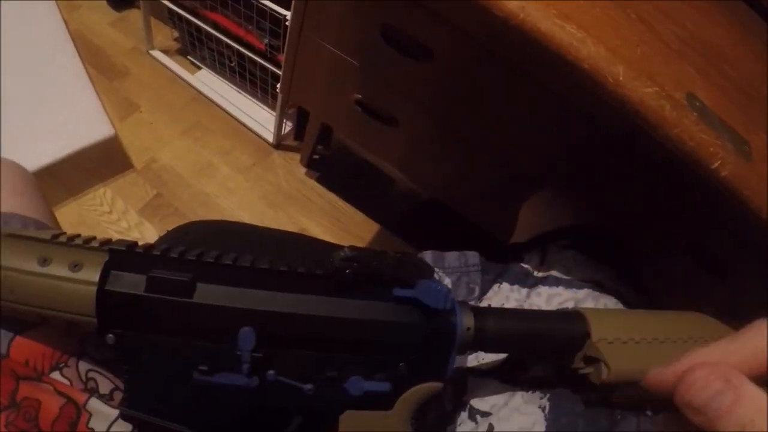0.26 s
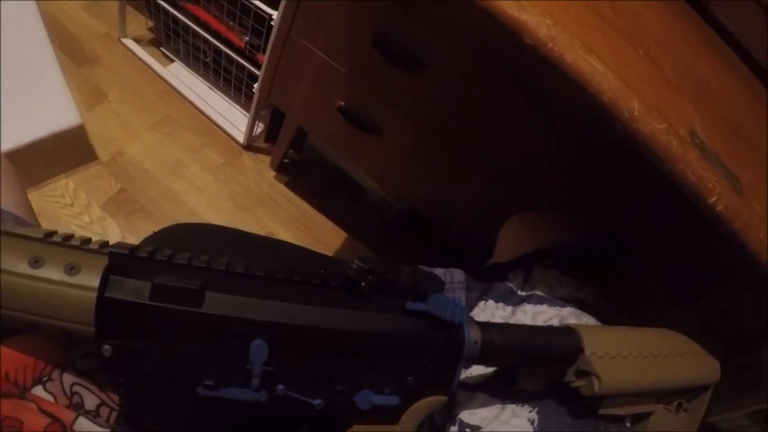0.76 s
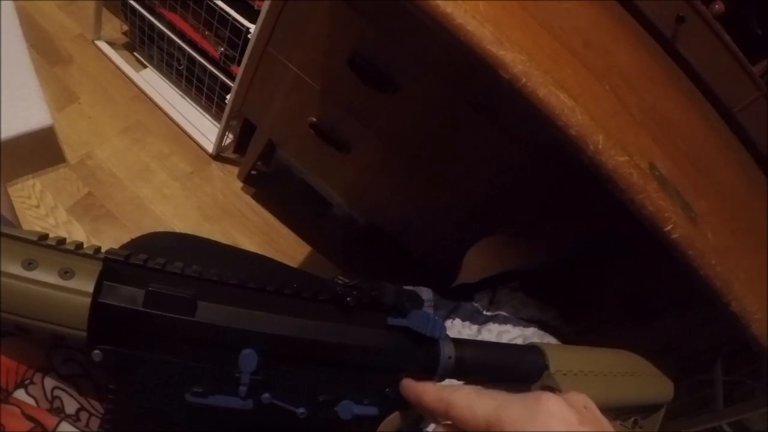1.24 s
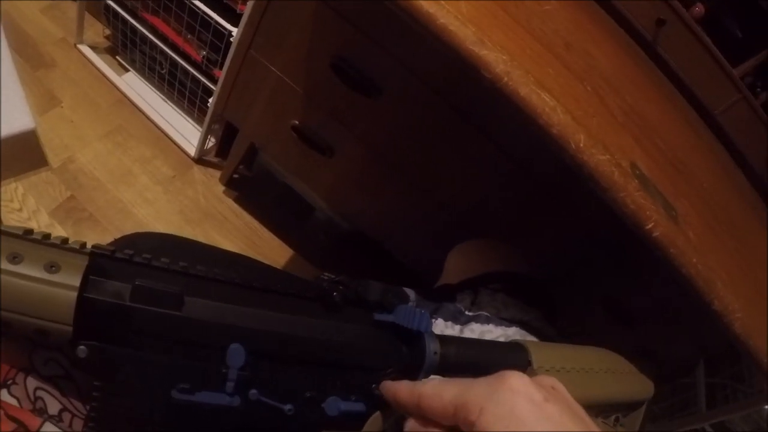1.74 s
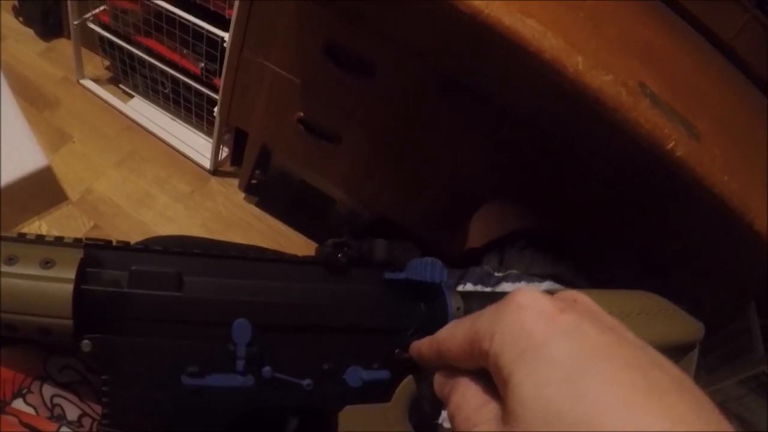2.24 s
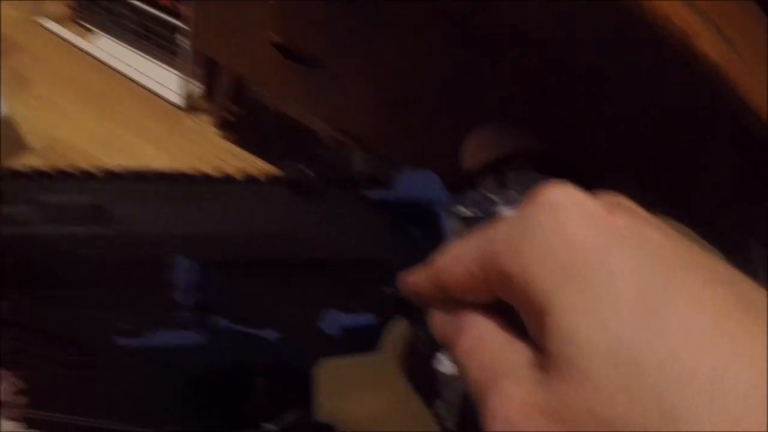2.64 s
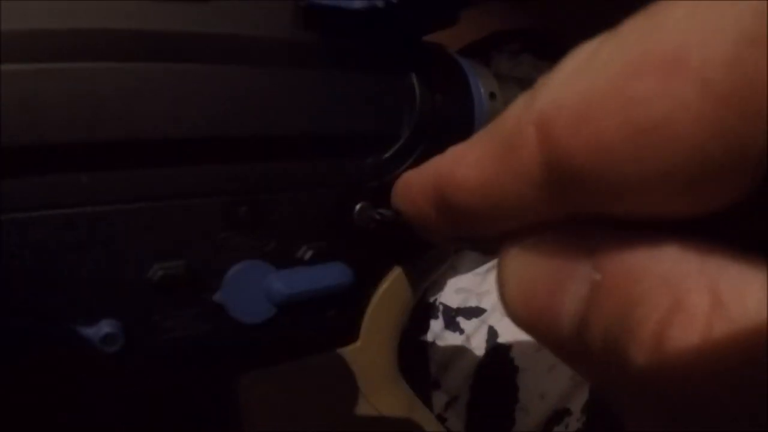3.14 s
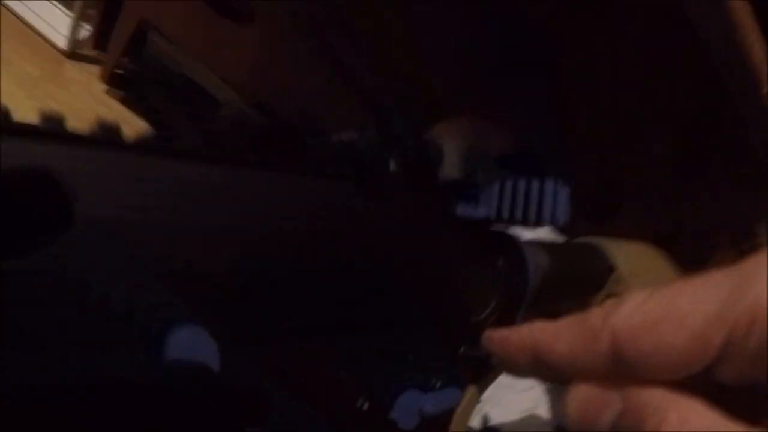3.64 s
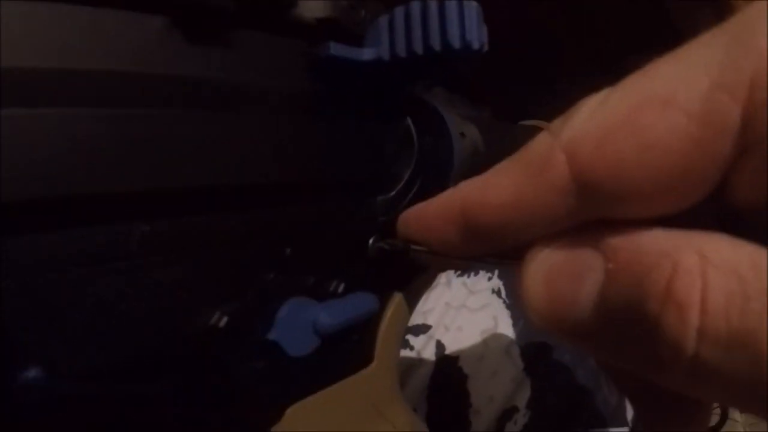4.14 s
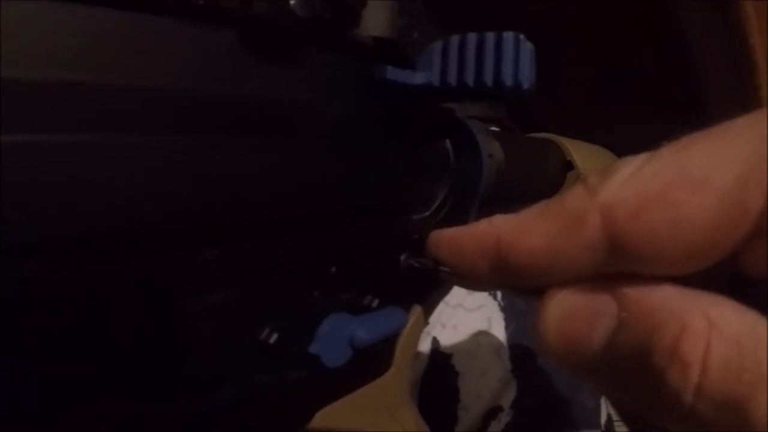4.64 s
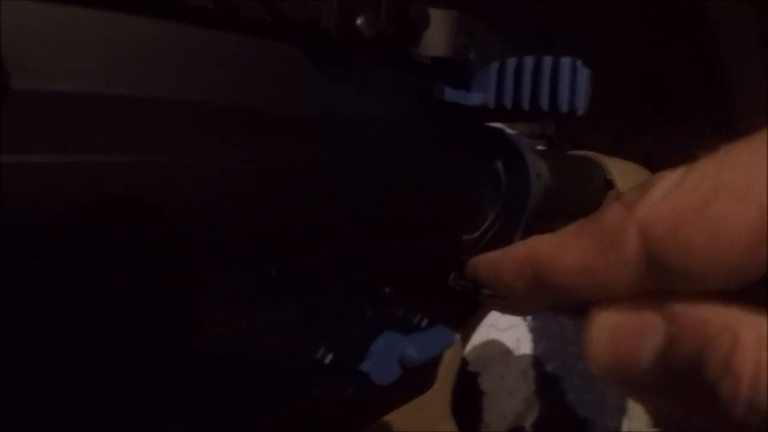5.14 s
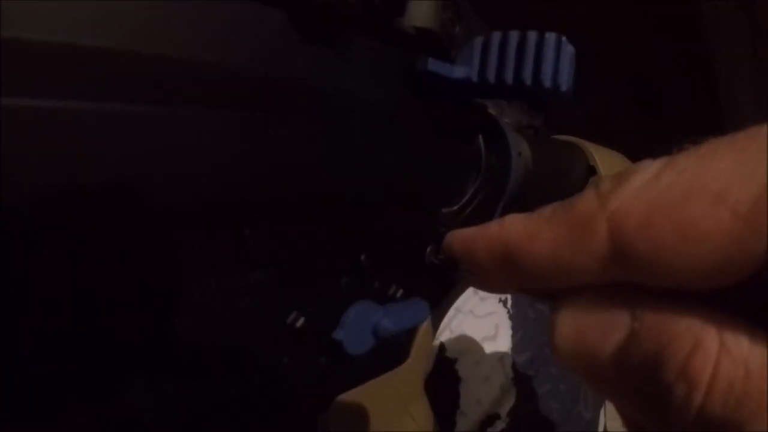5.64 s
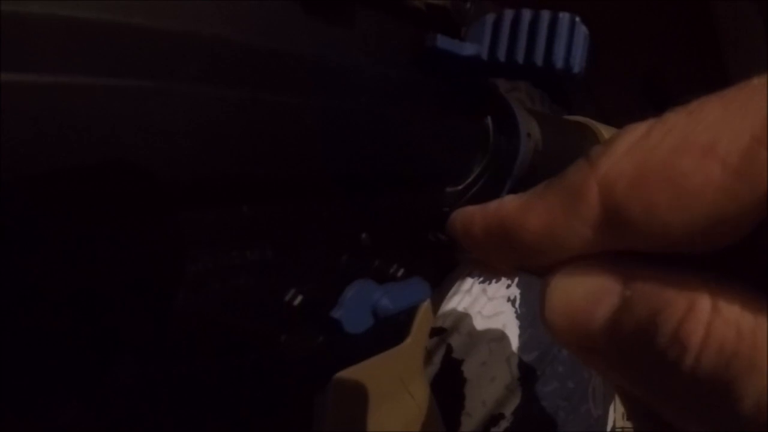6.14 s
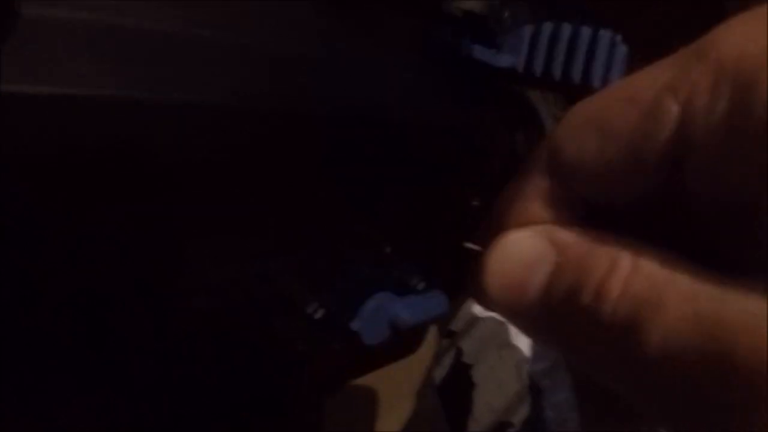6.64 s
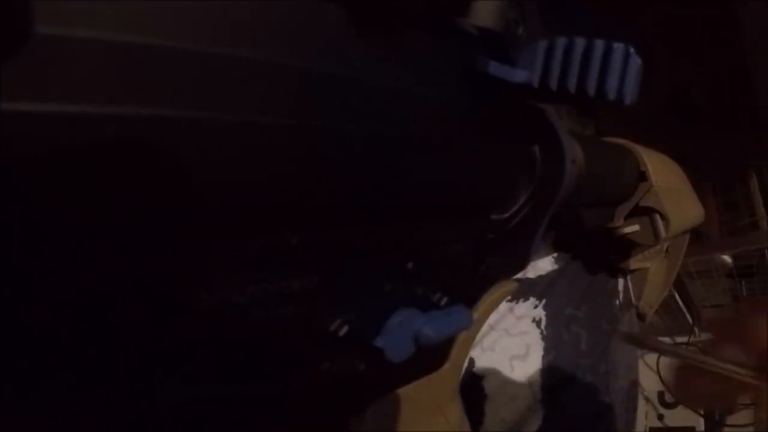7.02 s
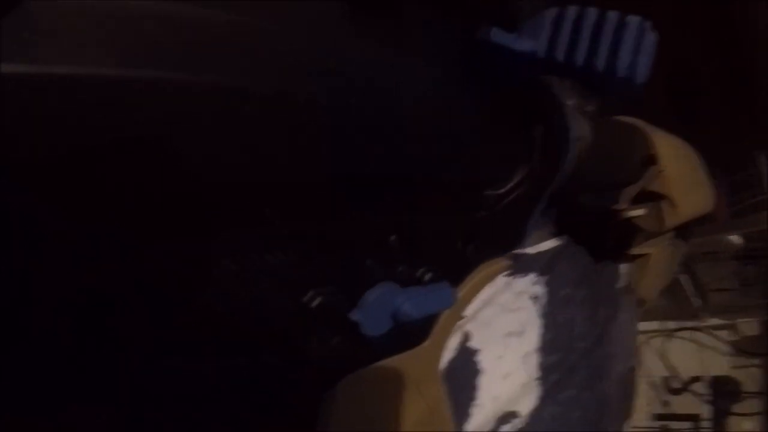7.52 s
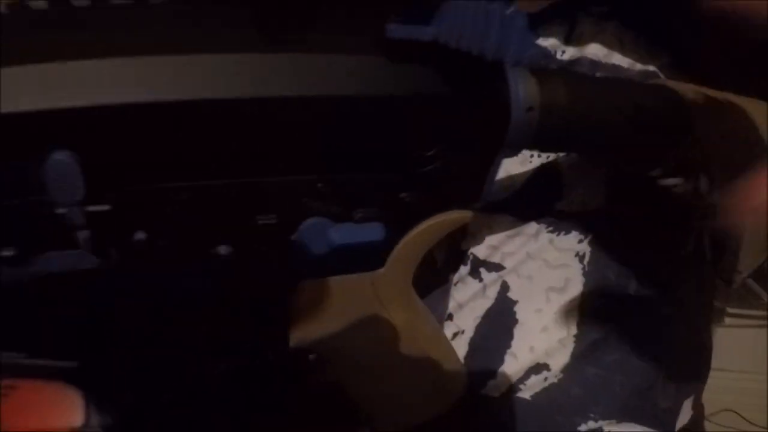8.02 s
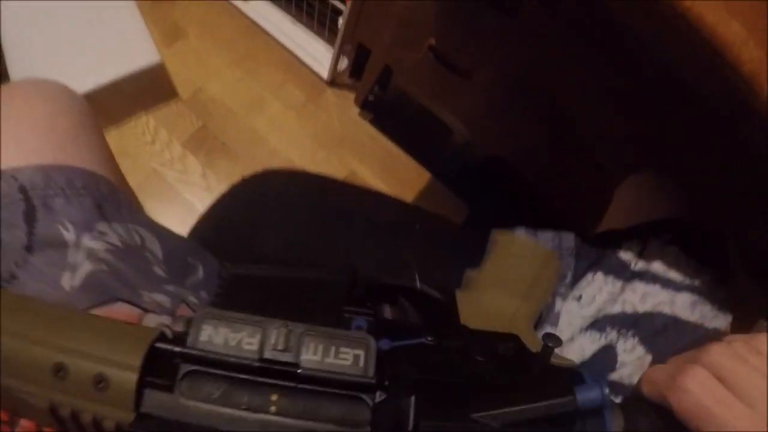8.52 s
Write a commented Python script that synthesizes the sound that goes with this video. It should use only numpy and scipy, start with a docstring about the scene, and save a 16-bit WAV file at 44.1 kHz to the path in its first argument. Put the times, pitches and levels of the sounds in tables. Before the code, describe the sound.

Faint ticks, then camera bumps and hard metallic clicks as a tool drives a pin through an airsoft rifle, ending in a ringing, rattling clatter.

```python
"""An airsoft rifle is handled on a lap in a small room: a tool clicks against a body pin and slides it
through, then the receiver swings open with a clatter. Contacts and slips drive damped resonances; a few
blows leave dying partials. A body-worn camera right above bumps the receiver, and decaying low sines
rock it on its mount. Coloured noises make the mount rumble, the clothes, a fingertip and the room's hush."""
import sys
import numpy as np
from scipy import signal
from scipy.fft import rfft, irfft, next_fast_len
from scipy.io import wavfile
from scipy.ndimage import map_coordinates

SR = 44100
rng = np.random.default_rng(int(sys.argv[2]) if len(sys.argv) > 2 else 0)


def to_wav(sig):
    """Store sig (one row per channel, or 1-D mono) as 16-bit WAV at the path in sys.argv[1].

    Samples outside -1..1 are clipped; the rate is SR.
    """
    pcm = np.clip(np.atleast_2d(sig), -1, 1) * 32767
    pcm = np.round(pcm).astype(np.int16)
    wavfile.write(sys.argv[1], SR, pcm.T)  # frames by channels


N = 386983

# resonances of the rifle: centre_hz, width_hz, level_db
RIFLE_MODES = [(197, 157, 2), (400, 240, -15), (695, 230, -9), (1238, 181, 5.5), (1590, 180, -0.5),
               (1970, 450, -3.5), (2760, 390, -4), (3770, 860, -4.5), (4700, 630, 2.5), (5900, 860, 1.5),
               (7120, 1450, -3.5), (8340, 1720, -13.5)]
# bands of knock, hollow, clack and tick: low_hz, high_hz
REGISTER_BANDS = [(150, 700), (800, 1700), (1700, 4500), (4500, 11500)]
IS_HOLLOW = np.arange(len(REGISTER_BANDS)) == 1


def amp(db):
    """Decibels to gain."""
    return 10 ** (np.asarray(db) / 20)


def unit(x):
    """Scale to rms 1."""
    return x / np.sqrt(np.mean(x ** 2) + 1e-20)


def along(points, hz):
    """Interpolate (Hz, value) points on a log frequency axis."""
    f, v = np.transpose(points)
    return np.interp(np.log(hz + 1), np.log(f + 1), v)


def wobble(knots_per_s):
    """A smooth random curve over the whole scene."""
    knots = rng.standard_normal(int(N * knots_per_s / SR) + 4)
    return map_coordinates(knots, [np.arange(N) * knots_per_s / SR])


def filtered(x, response):
    """Multiply the spectrum of x by a complex response of frequency."""
    n = x.shape[-1]
    m = next_fast_len(n + 8192)
    return irfft(rfft(x, m) * response(np.fft.rfftfreq(m, 1 / SR)), m)[..., :n]


def pan(left_right_db):
    """Left and right gains of constant power; positive leans left."""
    return unit(amp([[left_right_db / 2], [-left_right_db / 2]]))


def pair(n, alike):
    """Two white noises with the correlation alike."""
    a, b = rng.standard_normal((2, n))
    u = np.arccos(np.clip(alike, -1, 1)) / 2
    return np.array([np.cos(u) * a + np.sin(u) * b, np.cos(u) * a - np.sin(u) * b])


def rush(spectrum, alike):
    """Coloured stereo noise of rms 1, with a left-right correlation for each frequency."""
    def split(hz):
        u = np.arccos(np.clip(along(alike, hz), -1, 1)) / 2
        return amp(along(spectrum, hz)) * [np.cos(u), np.sin(u)]

    mid, side = filtered(rng.standard_normal((2, N)), split)
    return unit(np.array([mid + side, mid - side]))


def add(out, start_s, x):
    """Mix x into out from start_s."""
    i = max(round(start_s * SR), 0)
    out[:, i:i + x.shape[-1]] += x[..., :max(N - i, 0)]


def stroke(start_s, end_s, taper):
    """A gain that rises and falls between two times; taper is the share spent rising and falling."""
    u = np.clip((np.arange(N) / SR - start_s) / (end_s - start_s), 0, 1)
    edge = np.minimum(2 * np.minimum(u, 1 - u) / taper, 1)
    return np.sin(np.pi / 2 * edge) ** 2


def resonate(force, modes):
    """Pass a force through parallel damped resonances of alternating sign."""
    def response(f):
        total = 0
        for k, (centre, width, db) in enumerate(sorted(modes)):
            damping = 1j * f * width
            total = total + (-1) ** k * amp(db) * damping / (centre * centre - f * f + damping)
        return total

    return filtered(force, response)


def registers(force, modes):
    """A body's answer to a force, split into knock, hollow, clack and tick."""
    y = resonate(force, modes)
    filters = [signal.butter(2, band, 'band', fs=SR, output='sos') for band in REGISTER_BANDS]
    return [signal.sosfilt(sos, y) for sos in filters]


def tone(rule, strength_db, hardness_db):
    """Register levels of a contact: a harder one shifts its energy upward."""
    return np.array([strength_db + db + share * hardness_db for db, share in rule])


def strike(modes, levels_db, chatter_db, t60_s, alike):
    """A sharp push and a decaying noise chatter drive the modes; each register has its own level."""
    t = np.arange(SR // 12) / SR
    force = pair(len(t), alike) * amp(chatter_db - 60 * t / t60_s)
    force[:, 0] += 1
    # levels are rms with the energy referred to 5 ms
    scale = np.sqrt(.005 / t[-1])
    return [amp(db) * unit(y) * scale for db, y in zip(levels_db, registers(force, modes))]


def slipping(n, spread_db, alike):
    """A noise force of n samples in sub-millisecond slips; spread_db makes their strengths uneven."""
    slip_gains = amp(spread_db * rng.exponential(size=n // 32 + 1))
    return pair(n, alike) * np.repeat(slip_gains, 32)[:n]


def ring(partials):
    """Slowly dying partials, at slightly different strengths and phases for each microphone."""
    t = np.arange(SR * 3 // 4) / SR
    y = np.zeros((2, len(t)))
    for hz, db, t60_s in partials:
        level_db = db + rng.standard_normal((2, 1))
        phase = rng.uniform(0, 2 * np.pi) + .5 * rng.standard_normal((2, 1))
        y += amp(level_db - 60 * t / t60_s) * np.sin(2 * np.pi * hz * t + phase)
    return y * (1 - np.exp(-t / 0.00067))


def clicks():
    """Tool, pin and rifle parts knock the receiver; each spot wakes its resonances a little differently."""
    # contacts: start_s, strength_db, hardness_db, extra_hollow_db, left_right_db
    contacts = [(.369, -49.5, 1, -7, -11), (0.4218, -54, 3, 0, -17), (0.5163, -47.5, 0, -8, -27),
                (0.778, -54.5, -7, -4, -5), (1.167, -44, 2.5, -3, -6), (1.2614, -50.5, 7, -2, -11),
                (2.2779, -51, 3, -8, 1), (2.3237, -49.5, 9, 1, -7), (2.9785, -58, 4, -2, -5),
                (4.782, -33.5, -4.5, -6, -4), (4.8163, -25, -0.5, -0.5, -1.5), (5.0903, -45.5, 0, -3.5, 9),
                (5.366, -58, -1.5, 0, -4), (5.955, -22, -0.5, 6, 0), (5.966, -36.5, -5, -14, 16),
                (6.2023, -35, -4.5, -2.5, -1), (6.2084, -37.5, -1, 7.5, 6), (6.4959, -37, -4, -0.5, 3),
                (6.5449, -33.5, 10.5, -7, 5), (6.56, -25, 6, 5.5, 2), (6.561, -20, 2, -3, -1.5),
                (6.6561, -42, 0, -4.5, -1), (6.755, -60.5, -12, -2.5, -1), (6.828, -49.5, 3.5, 3, 2),
                (6.955, -51.5, 3.5, 1, -12), (7.1071, -50.5, 4.5, -6, -13), (7.742, -36, 0.5, 0, -4),
                (7.7633, -31, 0, 0, -7), (7.767, -27, -1, -9, -2), (7.7719, -28, -1, -4, -9),
                (7.864, -48, -5, 2.5, -8), (8.1647, -48.5, 6, -3, -16), (8.3032, -51.5, -1.5, 6.5, -10),
                (8.3444, -35.5, 0, 1, -1.5), (8.466, -47.5, 4, 4, -5), (8.6784, -34, 0.5, 0, -33)]
    # per register, low to high: offset_db, db_per_db_hardness
    tone_rule = [(-4, -1.36), (0.8, -0.99), (1.47, 0.12), (0.54, 1)]
    out = np.zeros((2, N))
    for start_s, strength_db, hardness_db, hollow_db, side_db in contacts:
        modes = [(hz, width, db + 2 * rng.standard_normal()) for hz, width, db in RIFLE_MODES]
        levels_db = tone(tone_rule, strength_db, hardness_db) + hollow_db * IS_HOLLOW
        knock, *bright = strike(modes, levels_db, chatter_db=-17.5, t60_s=0.024, alike=0.29)
        add(out, start_s, knock * pan(-1.5) + sum(bright) * pan(side_db))
    return out


def slides():
    """Sliding parts and fingers catch in many tiny slips; strokes swell into a stop or die away."""
    # slides and rattles: start_s, end_s, strength_db, hardness_db, swell_db
    slide_strokes = [(0.29, .316, -69, 10.5, 0), (0.506, 0.595, -63.5, -4, -8),
                     (1.16, 1.233, -55.5, 7, -18), (2.274, 2.303, -58.5, -0.5, -13),
                     (2.32, 2.389, -56, 6, -19), (2.749, 2.822, -57.5, -9.5, 27),
                     (2.86, 2.876, -55.5, -4, 4), (2.904, 2.922, -51, -2, -16),
                     (3.762, 3.835, -53, 1.5, -5), (4.769, 4.782, -58, 1, 5), (4.797, 4.822, -42, 0, 11),
                     (4.825, 4.86, -57, -2, -14), (5.09, 5.143, -57.5, 4, -10),
                     (5.936, 5.952, -52, -2.5, 13), (6.498, 6.521, -44, 3, 13), (6.517, 6.568, -36, 4, 3),
                     (6.926, 6.967, -62, 4, 12), (7.739, 7.765, -46.5, 1.5, -12),
                     (7.769, 7.866, -46, 0.5, -27), (8.161, 8.2, -58.5, 10.5, -8),
                     (8.209, 8.262, -56.5, -2.5, -3), (8.262, 8.288, -57, 5.5, 1),
                     (8.468, 8.497, -53, 6.5, -7), (8.659, 8.681, -53, -3, 4),
                     (8.679, 8.729, -51, -1.5, -17)]
    # per register, hollow to tick: offset_db, db_per_db_hardness
    tone_rule = [(-1.4, -1.02), (1.56, 0.072), (-1.2, 0.93)]
    # thin hiss of the rubbing surfaces: centre_hz, width_hz, level_db
    friction_modes = [(9140, 690, -10.5)]
    out = np.zeros((2, N))
    for start_s, end_s, strength_db, hardness_db, swell_db in slide_strokes:
        n = max(round((end_s - start_s) * SR), 64)
        pressure = signal.windows.tukey(n, .2) * amp(np.linspace(0, swell_db, n))
        force = slipping(n, spread_db=2.0, alike=0.13) * pressure
        force = np.pad(force, ((0, 0), (0, SR // 50)))  # room to ring out
        levels_db = tone(tone_rule, strength_db, hardness_db)
        parts = registers(force, RIFLE_MODES + friction_modes)[1:]
        y = sum(amp(db) * unit(part) for db, part in zip(levels_db, parts))
        add(out, start_s, y * np.sqrt(force.shape[1] / n))
    return out


def hinge():
    """The receiver drops against its stop and shudders on its hinge while its loose parts rattle out."""
    # shudder partials: pitch_hz, level_db, t60_s
    shudder = [(167.2, -36, 0.68), (193.5, -29, 0.53), (262, -39, 1), (457, -49, 0.44), (778, -45.5, 0.53),
               (1295, -34, 0.29), (1620, -36, 0.31), (1780, -26, 0.1), (2300, -32, 0.096)]
    # resonances of the open receiver: centre_hz, width_hz, level_db
    receiver_modes = [(177, 35, 10), (237, 68, 11), (330, 39, 7), (750, 160, 4.5), (1390, 300, 5),
                      (1740, 160, 7), (2310, 300, -1), (3600, 500, -9), (6100, 1240, -15)]
    start_s, rattle_db, rattle_t60_s = 7.765, -30.5, .38
    out, t = np.zeros((2, N)), np.arange(SR // 2) / SR
    # the parts come back against each other in uneven clumps
    clumps = amp(4.1 * wobble(91)[:len(t)])
    force = slipping(len(t), spread_db=0.0, alike=0.44) * clumps
    rattle = unit(resonate(force, receiver_modes))
    envelope = amp(rattle_db - 60 * t / rattle_t60_s) * (1 - np.exp(-t / 0.0015))
    add(out, start_s, rattle * envelope * pan(-3.5))
    add(out, start_s, ring(shudder) * pan(-0.5))
    return out


def rings():
    """A few blows leave the steel parts and the freed pin singing faintly."""
    # ringing blows: start_s, steel_db, pin_db
    blows = [(5.958, -40.5, -59), (6.207, -65, -61.5), (6.561, -51.5, -59)]
    # partials of the steel parts: pitch_hz, level_db, t60_s
    steel_partials = [(1050, -18.5, 0.36), (1200, -7, 0.2), (1245, -2, 0.5), (1610, -18, 0.23)]
    # partials of the pin: pitch_hz, level_db, t60_s
    pin_partials = [(5965, -7, 0.27), (6090, -17, .33), (6400, -5, 0.36), (6570, -6, .35),
                    (7171, -5.5, 0.41)]
    out = np.zeros((2, N))
    for start_s, steel_db, pin_db in blows:
        add(out, start_s, amp(steel_db) * ring(steel_partials) + amp(pin_db) * ring(pin_partials))
    return out


def bumps():
    """The camera hits the rifle: blows push the housing's two microphones in opposite senses."""
    # housing blows: start_s, strength_db, hardness_db, extra_hollow_db, contact_resonance_hz
    blows = [(2.6344, -31.5, -9, -0.5, 2300), (2.727, -52.5, -11.5, -0.5, 2400), (2.8212, -21, -7, 2, 2500),
             (2.8606, -36, -10, -4, 2500), (2.903, -35.5, -14, 1, 3600), (2.912, -38, -8, 0, 3500),
             (2.9185, -39.5, -12, 4, 3460), (3.659, -31.5, 3.5, 2, 3260), (3.7571, -23.5, -3.5, -7.5, 2440),
             (3.836, -44, -5, 0, 2600), (3.8487, -43, -4.5, -1, 2530), (5.723, -39, -7.5, 5.5, 2120)]
    # resonances of the housing: centre_hz, width_hz, level_db
    housing_modes = [(175, 100, 7), (316, 79, -23), (620, 167, -13.5), (1140, 530, -1.5), (1570, 260, -1),
                     (5860, 1040, -7.5), (8000, 3100, -13.5)]
    # per register, low to high: offset_db, db_per_db_hardness
    tone_rule = [(-0.5, -1.5), (1, -0.7), (3, 0.96), (-4.5, 2)]
    # weaker pickup of blows at the left microphone: freq_hz, gain_db
    left_pickup = [(120, -31), (300, -11.5), (600, -6.5), (1100, -1.1), (3000, -7.5)]
    out = np.zeros((2, N))
    for start_s, strength_db, hardness_db, hollow_db, contact_hz in blows:
        modes = housing_modes + [(contact_hz, 450, -2)]
        levels_db = tone(tone_rule, strength_db, hardness_db) + hollow_db * IS_HOLLOW
        knock, hollow, clack, tick = strike(modes, levels_db, chatter_db=-12.5, t60_s=0.019, alike=0.86)
        high = clack + tick
        high[0] = np.roll(high[0], 4)  # left lags by 4 samples
        add(out, start_s, (knock + hollow + high) * [[1], [-1]])
    out[0] = filtered(out[0], lambda hz: amp(along(left_pickup, hz)))
    return out


def shoves():
    """Each shove sets the camera swinging: a sine that decays over a few cycles."""
    # jolts of the camera: start_s, pitch_hz, level_db, left_right_db
    jolts = [(2.633, 172, -27, -16), (2.801, 129, -22, -21), (2.812, 145, -13.5, -22),
             (2.86, 138, -16, -25), (2.901, 109, -16, -24), (2.982, 46.7, -26.5, -23),
             (3.7574, 470, -18, -11), (3.758, 139, -13, -22), (3.837, 87, -15.5, -11),
             (3.936, 65, -21.5, -29), (4.786, 53.4, -27.5, -4), (4.802, 144, -18.5, -3),
             (4.816, 43, -21, -9), (4.862, 217, -30, -2), (5.954, 171, -12, -4.5), (5.956, 48, -16.5, -13),
             (6.208, 51.7, -12.5, -7), (6.325, 205, -29, -3), (6.329, 370, -35, -3),
             (6.5, 137.7, -19.5, -4), (6.522, 49, -18, -4), (6.559, 44.4, -9.5, -5), (6.759, 172, -25, -3),
             (7.593, 57.5, -22, -14), (7.643, 72, -21.5, -23), (7.979, 164, -22.5, -9),
             (7.992, 47, -21.5, -25), (8.679, 427, -37, -20)]
    t60_cycles = 6.9
    out, t = np.zeros((2, N)), np.arange(SR // 3) / SR
    for start_s, hz, db, side_db in jolts:
        envelope = amp(db - 60 * hz * t / t60_cycles) * (1 - np.exp(-t / 0.001))
        add(out, start_s, -pan(side_db) * envelope * np.sin(2 * np.pi * hz * t))
    return out


def cloth():
    """Gains of muffled rub and rustle: every stroke adds its power to that of the resting clothes."""
    # arm or rifle moving over the clothes: start_s, end_s, rub_db, rustle_db
    cloth_strokes = [(0.084, 0.973, -62, -61.5), (0.492, 0.586, -55.5, -65), (0.76, 0.812, -51, -68),
                     (2.664, 2.917, -48.5, -68), (3.04, 3.13, -54.5, -75), (3.35, 3.855, -64, -64),
                     (3.697, 3.932, -44.5, -70), (4.76, 4.98, -58, -72), (5.53, 6.15, -65, -66),
                     (6.458, 6.6, -39.5, -50), (7.218, 7.726, -59, -62), (7.554, 8.27, -48, -70),
                     (8.068, 8.38, -44.5, -55), (8.28, 9, -59, -59.5)]
    resting_rub_db, resting_rustle_db = -65, -73
    power = amp([[resting_rub_db], [resting_rustle_db]]) ** 2
    for start_s, end_s, rub_db, rustle_db in cloth_strokes:
        power = power + (amp([[rub_db], [rustle_db]]) * stroke(start_s, end_s, taper=0.76)) ** 2
    return np.sqrt(power)


def handling():
    """The wearer's body moves the camera and its mount rumbles; cloth and skin rub in small grains."""
    # mount rumble, before a common offset: time_s, relative_db
    sway = [(0.0, -56), (0.71, -66.5), (2.22, -80), (2.76, -70), (2.98, -50.5), (3.3, -50), (3.62, -40),
            (3.89, -39), (4.76, -47), (4.91, -49.5), (5.77, -60.5), (6.38, -47), (7.72, -43), (8.11, -44),
            (8.63, -58), (8.78, -62)]
    # rumble spectrum: freq_hz, relative_db_per_hz
    rumble_spectrum = [(12, -16), (22, -6), (28, -3), (36, -9.5), (55, -13.5), (90, -23.5), (150, -30),
                       (300, -84)]
    # muffled rub spectrum: freq_hz, relative_db_per_hz
    rub_spectrum = [(70, -64), (120, -7.5), (165, 1), (240, -2), (350, -8.5), (550, -14.5), (1200, -32.5),
                    (3000, -61)]
    # rustle spectrum: freq_hz, relative_db_per_hz
    rustle_spectrum = [(300, -15), (700, -0.5), (1400, 4.5), (2500, -1.5), (4000, -3.5), (6300, 0.5),
                       (8000, -5.5), (10000, -12.5), (13000, -26), (16000, -45)]
    times_s, sway_db = np.transpose(sway)
    rumble_db = np.interp(np.arange(N) / SR, times_s, sway_db) + 5.5
    rumble = amp(rumble_db) * rush(rumble_spectrum, [(30, 0.48)]) * pan(-5)
    rub_gain, rustle_gain = cloth()
    catching = amp(3.5 * wobble(30))
    rub = rub_gain * catching * rush(rub_spectrum, [(150, 0.89), (700, -0.56)]) * pan(-5.5)
    grains = amp(0.63 * wobble(25) + 2.1 * wobble(250))
    rustle = rustle_gain * grains * rush(rustle_spectrum, [(1000, .1), (6000, 0.16)])
    return rumble + rub + rustle


def fingertip():
    """Dry skin brushes the receiver and hisses thinly over its finish."""
    # one brush: start_s, end_s, level_db
    brush = (3.13, 3.35, -60.5)
    # skin hiss spectrum: freq_hz, relative_db_per_hz
    skin_spectrum = [(1000, -9), (5200, -21), (6800, -5), (9000, -2), (10500, -14), (14000, -30)]
    start_s, end_s, db = brush
    gain = amp(db + 1.5 * wobble(30)) * stroke(start_s, end_s, taper=0.72)
    return gain * rush(skin_spectrum, [(6000, 0.44)])


def room(x):
    """The small furnished room answers with a short diffuse tail of decaying noise."""
    # decay of the room: freq_hz, t60_s
    decay = [(150, 0.1), (1200, 0.25), (6000, 0.3), (14000, 0.082)]
    hz, t, z = signal.stft(rng.standard_normal((2, SR // 2)), SR, nperseg=256)
    z = z * amp(-60 * t / along(decay, hz)[:, None])
    tail = signal.istft(z, SR, nperseg=256)[1]
    tail = tail / np.linalg.norm(tail[0])
    tail = np.pad(tail, ((0, 0), (round(0.0035 * SR), 0)))  # 3.5 ms pre-delay
    return signal.fftconvolve(x, tail, axes=1)[:, :N]


def hush():
    """The steady background of the room and the microphones' hiss."""
    # hush spectrum: freq_hz, relative_db_per_hz
    hush_spectrum = [(40, -29), (90, -39), (125, -9.5), (170, 0.5), (260, -6.5), (400, -8.5), (700, -9),
                     (1300, -14.5), (2500, -25), (4500, -31), (6500, -28), (9500, -28), (12000, -35.5),
                     (15000, -44), (16000, -72)]
    # left and right are in opposite phase in the midrange: freq_hz, left_right_correlation
    correlation = [(60, .46), (130, -0.11), (290, -0.33), (640, -0.84), (1410, -0.74), (3100, 0.27),
                   (15000, -0.19)]
    return amp(-54.5) * rush(hush_spectrum, correlation)


def scene():
    """Airborne sounds reach the room; those inside the housing hardly do."""
    rifle = clicks() + rings() + slides() + hinge()
    housing = bumps()
    reverb = room(amp(-16.5) * rifle + amp(-30.5) * housing)
    return rifle + housing + reverb + shoves() + handling() + fingertip() + hush()


def record(dry):
    """Low-pass the mix at top_hz."""
    top_hz = 15800
    return filtered(dry, lambda hz: hz < top_hz)


dry = scene()
out = record(dry)
to_wav(out)
```